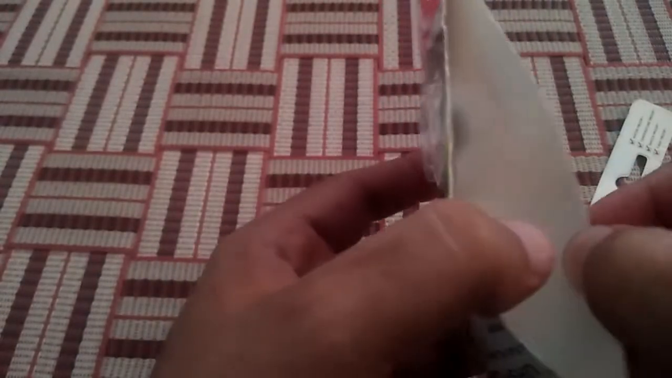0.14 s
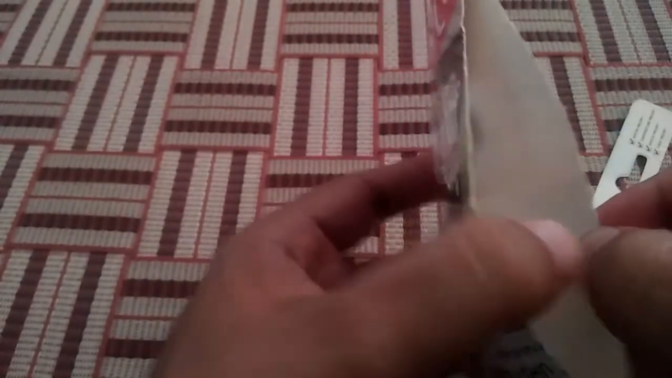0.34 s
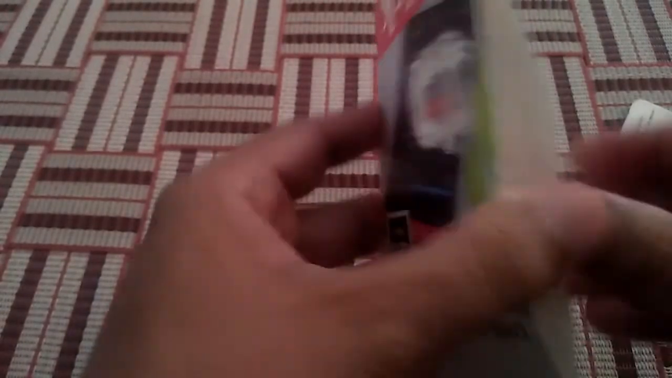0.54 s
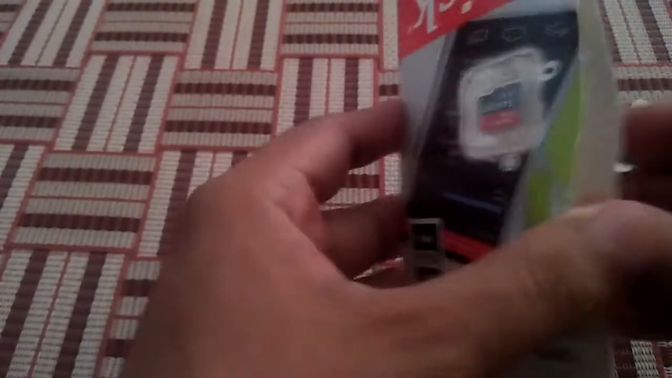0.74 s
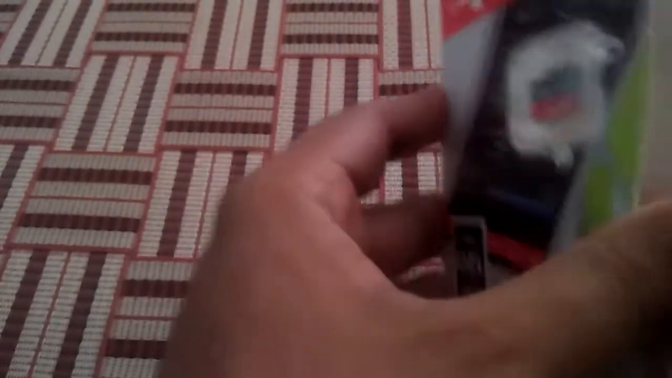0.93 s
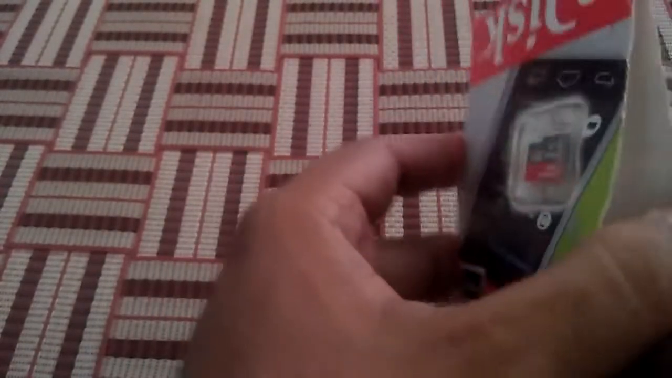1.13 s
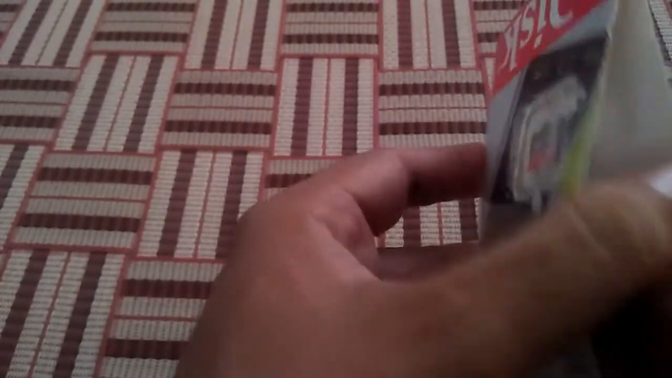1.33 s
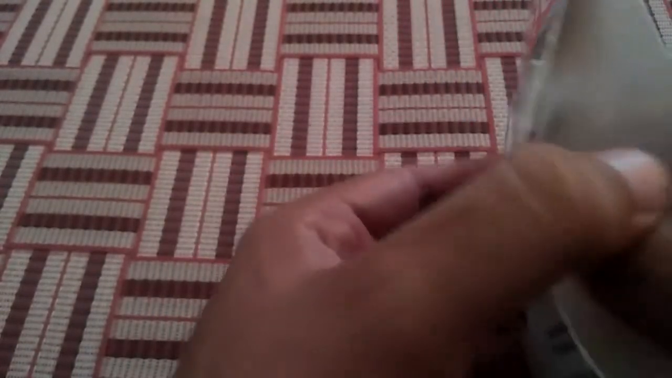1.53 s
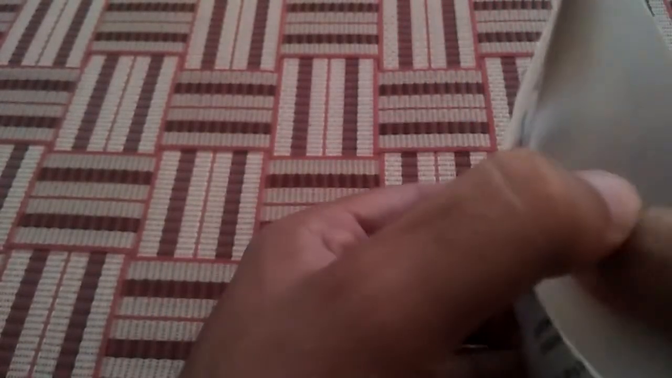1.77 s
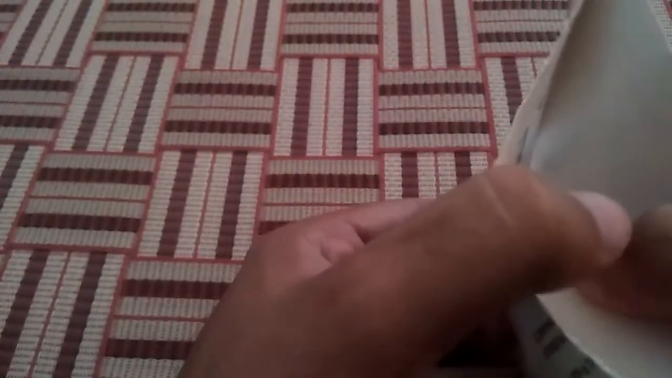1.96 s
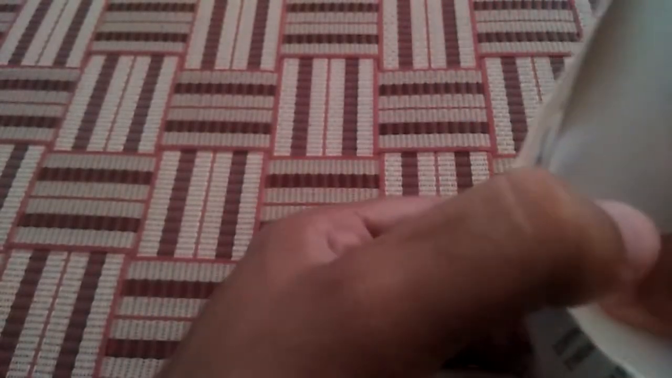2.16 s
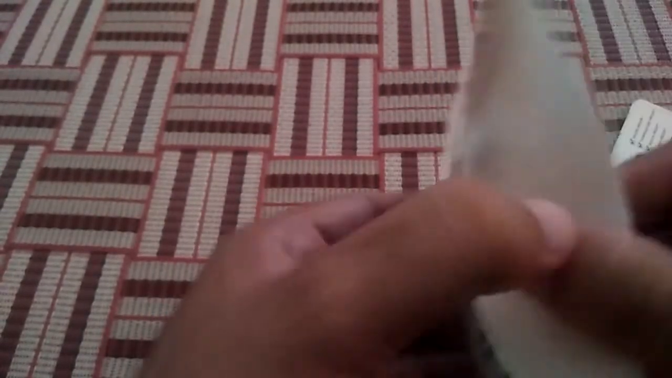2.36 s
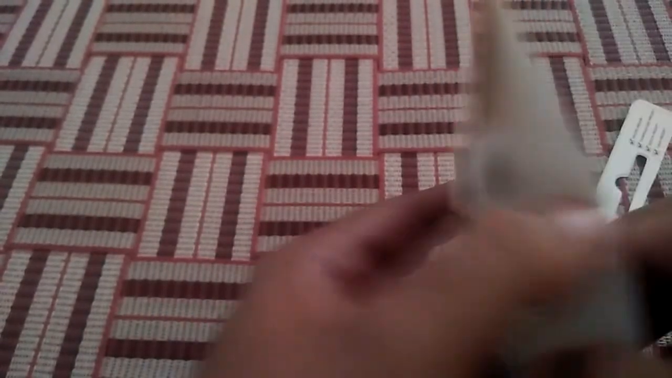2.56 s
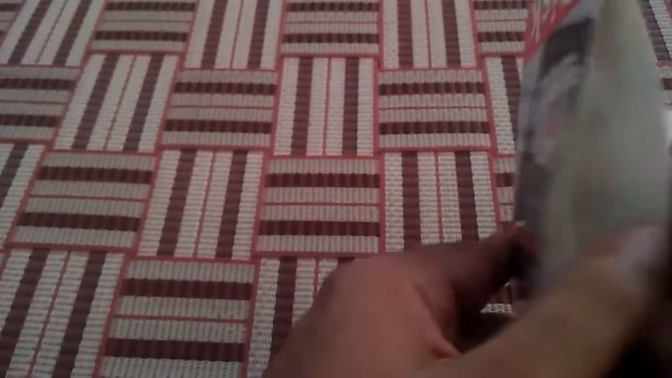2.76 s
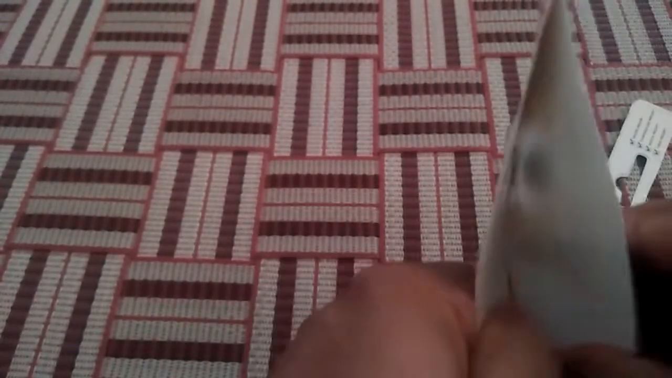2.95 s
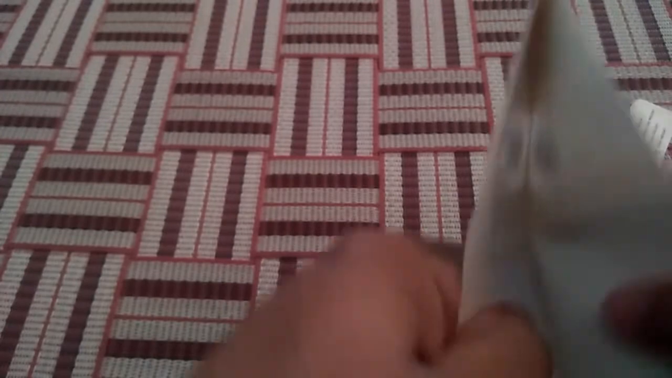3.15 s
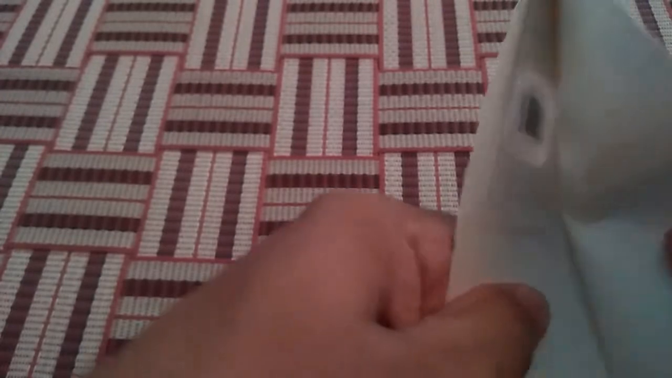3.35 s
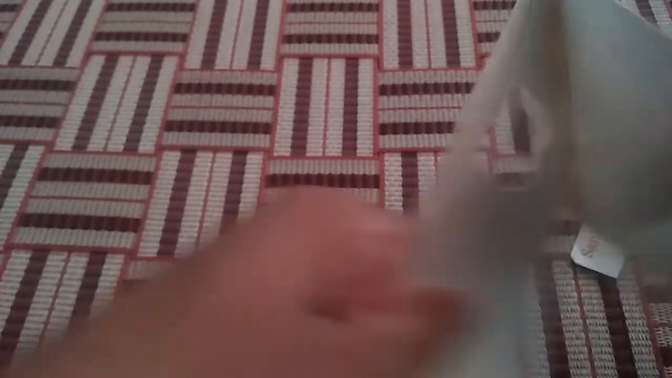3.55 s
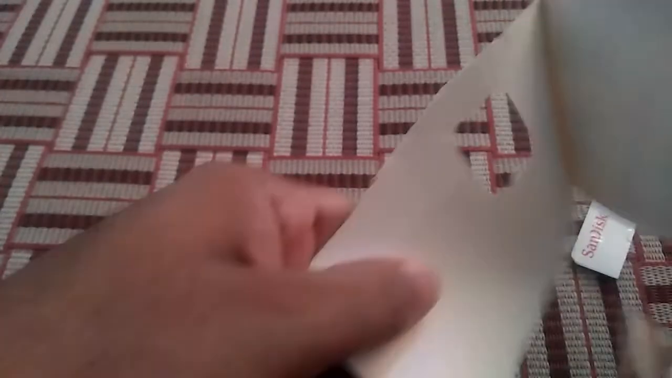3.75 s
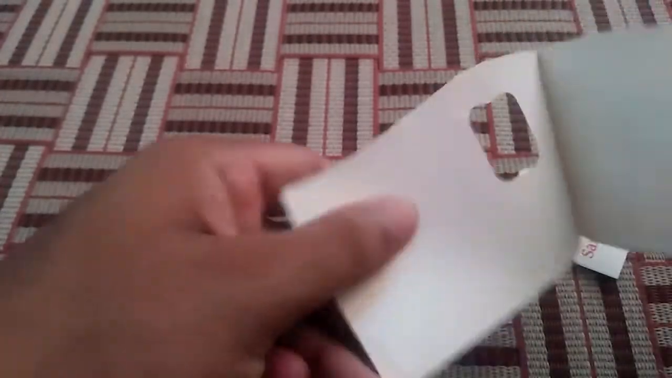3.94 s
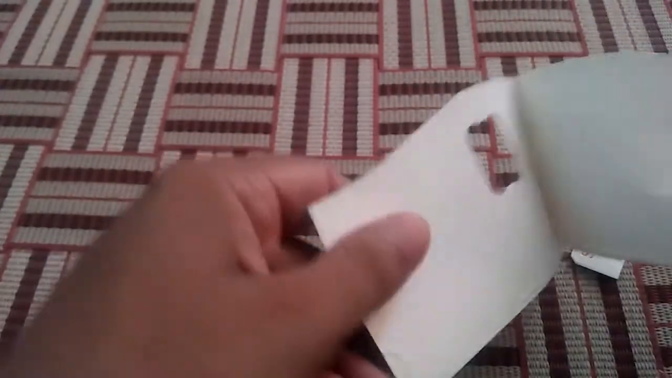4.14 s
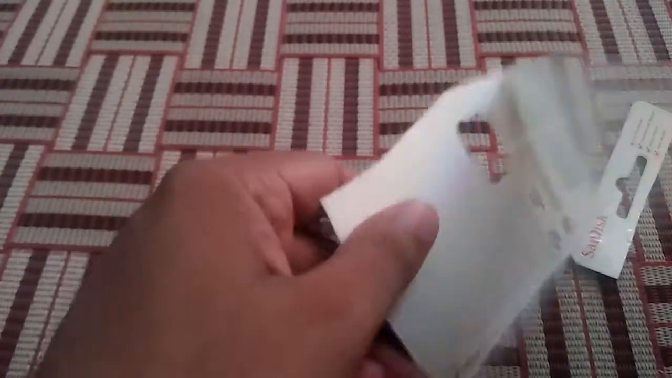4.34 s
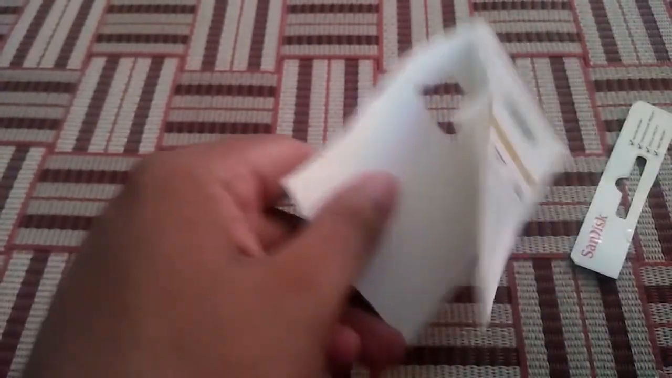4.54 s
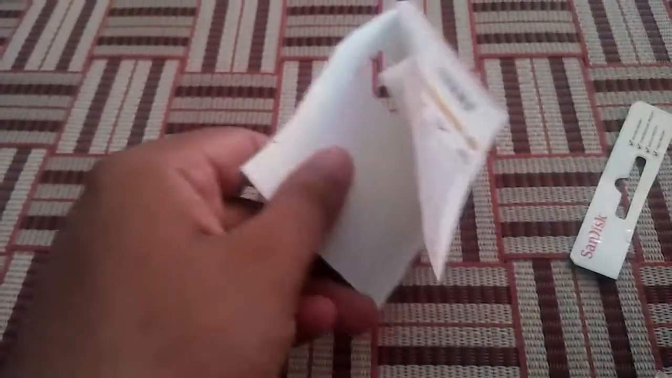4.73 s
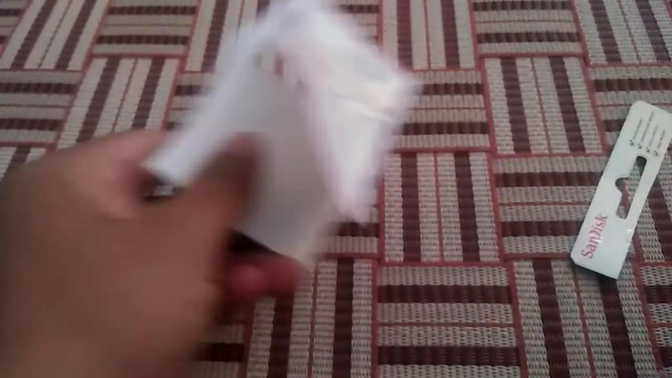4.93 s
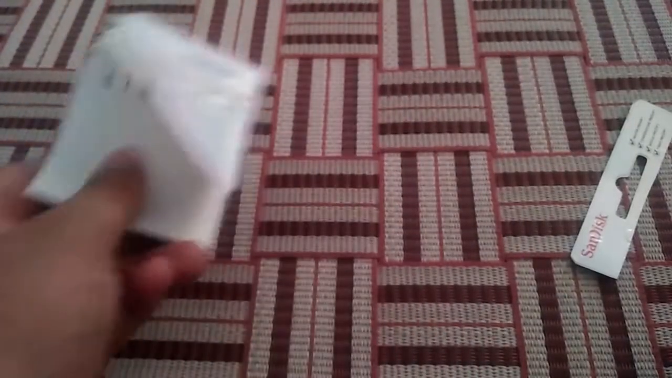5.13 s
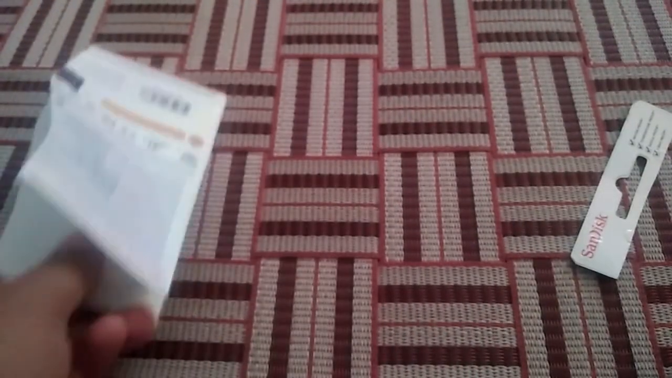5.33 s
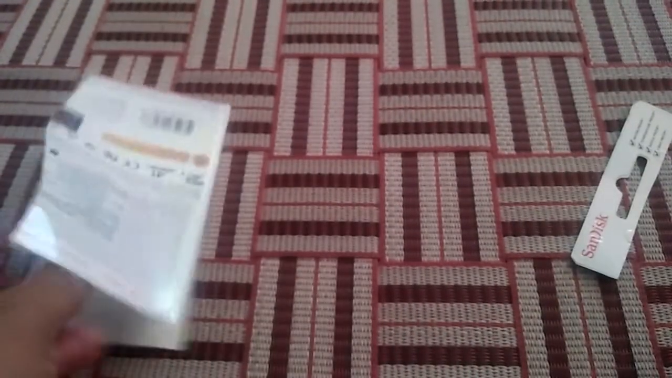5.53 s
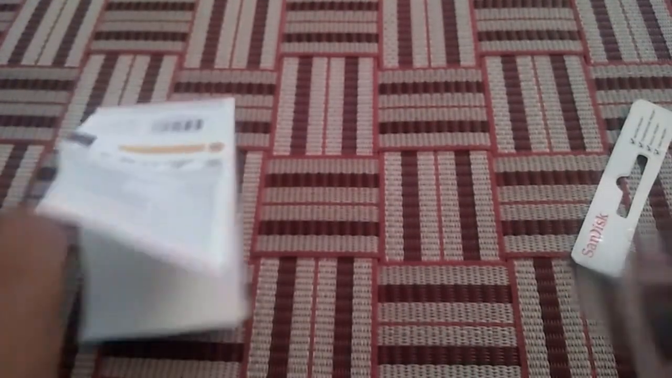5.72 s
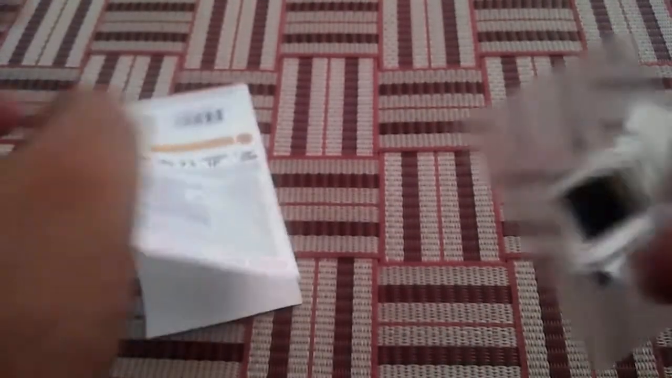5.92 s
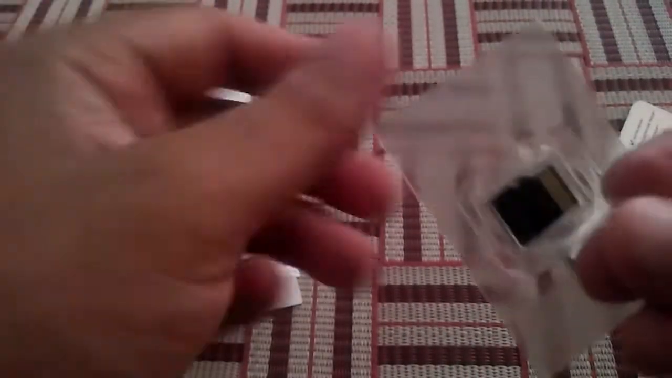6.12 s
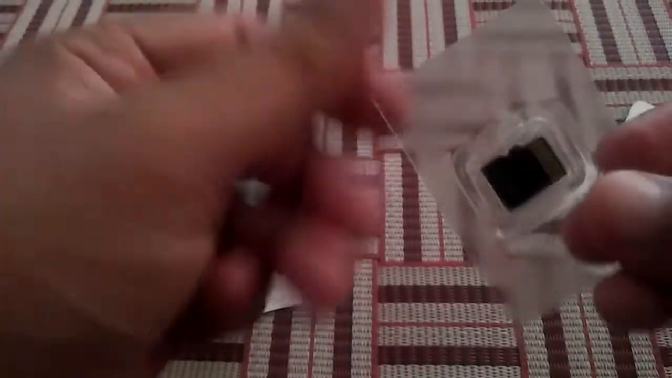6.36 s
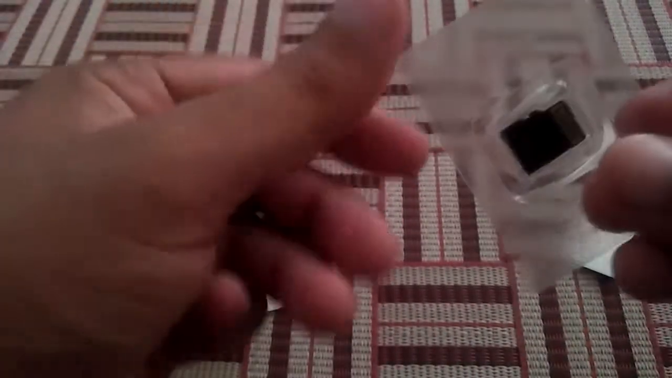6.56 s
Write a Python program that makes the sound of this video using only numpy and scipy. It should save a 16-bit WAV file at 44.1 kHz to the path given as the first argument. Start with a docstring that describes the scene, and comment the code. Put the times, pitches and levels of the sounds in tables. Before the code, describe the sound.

Hands open a cardboard and plastic package, heard up close in a quiet room. Soft rubbing and scattered ticks come first, then raspy prying and crackly peeling. A sharp plastic crack leads into a brief, loud tear, and the loose flap pushes air at the microphone. It ends with a few light card swishes, small clicks and faint bumps as the packaging is put down.

```python
"""Two hands open a card-and-plastic blister pack close to a phone in a small, quiet room.
First fingers rub the card in stick-slip friction and creases click. A thumb pries at the glued
layers, they peel, and near 3.1 s the blister snaps free. At 3.7 s the card gives way in one loud rip,
a dense train of fibre snaps, and the loose flap puffs air at the microphone.
Last, the empty card is laid on a mat with light brushes and soft thumps."""
import sys
import numpy as np
from scipy import signal
from scipy.fft import rfft, irfft, next_fast_len
from scipy.io import wavfile
from scipy.ndimage import uniform_filter1d

SR = 44100
rng = np.random.default_rng(int(sys.argv[2]) if len(sys.argv) > 2 else 0)


def output_pcm(signal):
    """Save a mono or channel-first signal as 16-bit PCM at the path in sys.argv[1].

    Samples are clipped to [-1, 1] before scaling.
    """
    pcm = np.clip(np.atleast_2d(signal).T, -1, 1) * 32767
    wavfile.write(sys.argv[1], SR, np.round(pcm).astype(np.int16))


N = 294971
TIME = np.arange(N) / SR


def rip(pocket_db=-6):
    """Fracture: the tear races along the card in dense, coarse snaps and excites the air in the slit."""
    # Each row: frequency in Hz, gain in dB.
    rip_tone = [(71, -33), (120, -7.5), (223, -10.5), (362, -27.5), (451, -11), (609, -17), (715, -2),
                (1050, -7), (1160, 2), (1840, 1.5), (2800, -2), (4100, -0.5), (4720, -0.5), (10300, -6.5),
                (14500, -14)]
    # The slit's resonance: shut pitch in Hz, open pitch in Hz, width in Hz, exponent of the glide.
    slit = (1800, 1050, 800, .3)
    tear = friction("rip", rip_tone, hiss=.35, spread_db=3, slips_per_s=2200)
    return tear + undb(pocket_db) * air_pocket(effort("rip"), *slit, follow=.72)


def squeak(start_s=3.697, length_s=.007, start_hz=7000, end_hz=10600, db=-20):
    """Periodic stick-slip: at the height of the rip the slips fall into step and speed up."""
    out, progress = np.zeros(N), np.linspace(0, 1, int(length_s * SR))
    hz = end_hz + (start_hz - end_hz) * (1 - progress) ** 2
    chirp = np.sin(2 * np.pi * np.cumsum(hz) / SR)
    add(out, start_s, undb(db) * np.sin(np.pi * progress) * chirp)
    return out


def cracks(level_db=-7, facet_db=-2, ring_db=-16, rise_s=.00045, decay_s=.0018):
    """Impulse excitation: an avalanche of fibres flicks the nearest facet and rings the whole pack."""
    # Each row: start in seconds, relative level in dB, low and top bands in dB against the middle band,
    # facet pitch in Hz.
    creases = [(.2495, -31, -26, -14, 6800), (.3056, -38, -30, 5, 6840), (.365, -48, -21, 15, 9470),
               (.5207, -49, 12, -23, 970), (.689, -34.5, -14, -22, 1850), (.7176, -48, -16, -21, 3000),
               (.9065, -32, 5, -12, 1800), (1.4855, -43, 3, -9, 1830), (1.5439, -49.5, -8, -2, 1860),
               (1.5784, -43, 0, -13, 1830), (1.7734, -45.5, 4, -5, 2220), (1.8074, -48, -20, 2, 4790),
               (1.8689, -42, -22, -8, 2150), (1.898, -41.5, -19, -4, 2330), (1.915, -42.5, -8, 1, 2110),
               (2.0538, -39.5, -30, 11, 5040), (2.3187, -33, 1, -16, 1840), (2.3618, -37, 1, 6, 9310),
               (2.3877, -45.5, 14, -4, 2080), (2.4232, -28, 3, -5.5, 2140), (2.4739, -28.5, -16, 0, 2010),
               (2.4862, -36, -28, -19, 2250), (2.6774, -46.5, 3, -24, 2420), (2.9523, -48, -8, -4.5, 4500),
               (2.9896, -35.5, -22, 2, 2390), (3.0664, -26, -6, -2, 3870), (3.0795, -9, 0, -4.5, 2260),
               (3.1112, -16.5, -12, -6, 1820), (3.3845, -39, -4, -10, 1935), (3.8495, -33, 10, 10, 1120),
               (3.8836, -35, -19, -16, 1430), (4.4366, -39.5, -12, -14, 1870),
               (5.2088, -25.5, -30, -4.5, 3100), (5.2497, -31, -30, -6.5, 1660),
               (5.2558, -39, -27, 1, 4200), (5.4988, -31, -20, -1, 9110), (5.7795, -35, -25, 1, 2770),
               (5.9503, -49.5, 8, -17, 1360)]
    bands_hz = [(600, 1420), (1300, 5770), (6000, 11000)]
    out, t = np.zeros(N), TIME[:SR // 16]
    burst = np.exp(-t / decay_s) * (1 - np.exp(-t / rise_s))
    burst_rms = np.sqrt(np.mean(burst ** 2))
    for start, db, low_db, top_db, facet_hz in creases + faint_cracks():
        low, mid, top = (unit(band(rng.standard_normal(len(t)) * burst, *edges)) for edges in bands_hz)
        fibres = (undb(low_db) * low + mid + undb(top_db) * top) * burst_rms
        facet = undb(facet_db) * burst * np.sin(2 * np.pi * facet_hz * t)
        add(out, start, undb(db + level_db) * (fibres + facet + undb(ring_db) * pack_ring(t)))
    return out


def faint_cracks(db=-57, scatter_db=2, low_db=-6, top_db=-6, facet_hz=1900, count=3):
    """Random stress release: rows for small creases that tick while a thumb feels for the edge."""
    # Each row: start and end of a fumble in seconds.
    fumbles = [(0, .22), (1.6, 1.86)]
    rows = []
    for start, end in fumbles:
        for k in range(count):
            moment = start + (end - start) * (k + rng.random()) / count
            rows.append((moment, db + scatter_db * rng.standard_normal(), low_db, top_db, facet_hz))
    return rows


def pack_ring(t, detune=.037):
    """Free vibration: the pack's modes decay, and bending shifts them a little from blow to blow."""
    # Each row: frequency in Hz, time to fall 60 dB in seconds, relative level in dB.
    pack_modes = [(1144, 0.022, -7), (1610, 0.033, -4), (1898, 0.049, 1), (2277, .025, 7.5),
                  (3010, 0.048, -5), (3996, .02, -2), (4400, 0.012, -8.5)]
    hz, t60, db = np.transpose(pack_modes)[:, :, None]
    hz = hz * (1 + detune * rng.standard_normal(hz.shape))
    return np.sum(undb(db - 60 * t / t60) * np.sin(2 * np.pi * hz * t), axis=0)


def pops():
    """Buckling: a patch of card or blister snaps through and swings a few times at its own pitch."""
    # Each row: start in seconds, level in dB, pitch in Hz, rise time in seconds.
    buckles = [(0.2508, -35.5, 1560, 0.0016), (2.3622, -23.5, 13300, 0.00047), (3.0665, -34, 3830, .0012),
               (3.0794, -15.5, 1300, .0007), (3.084, -25.5, 4020, 0.0014), (3.1111, -23, 1800, 0.00082),
               (3.283, -41.5, 1750, 0.0019), (3.3835, -38, 1935, 0.001), (3.6745, -23, 620, .0015),
               (3.7272, -21, 1370, 0.00053)]
    out, t = np.zeros(N), TIME[:SR // 16]
    for start, db, hz, rise_s in buckles:
        envelope = t / rise_s * np.exp(1 - t / rise_s)
        add(out, start, -undb(db) * envelope * np.sin(2 * np.pi * hz * t))
    return out


def pry(rasp_db=-1, pocket_db=-10.5, upper_ratio=2.15, upper_width_hz=1500):
    """Cavity resonance: a thumb rasps between the glued layers; the slit rings in two broad modes."""
    # Each row: frequency in Hz, gain in dB.
    pry_tone = [(400, -38), (1000, -9), (1550, -14), (2000, 0), (2600, -4), (3000, -11.5), (3800, -7),
                (5000, 6.5), (6500, -4.5), (8500, -0.5), (11000, -2.5), (14000, -4.5)]
    # The slit's lower mode: shut pitch in Hz, open pitch in Hz, width in Hz, exponent of the glide.
    slit = (2650, 1850, 550, 1.05)
    shut_hz, open_hz, _, bend = slit
    rasp = friction("pry", pry_tone, hiss=.6, spread_db=2.8)
    press = effort("pry")
    upper = air_pocket(press, upper_ratio * shut_hz, upper_ratio * open_hz, upper_width_hz, bend)
    lower = air_pocket(press, *slit)
    fits = unit(undb(3.5 * walk(120)))
    return undb(rasp_db) * rasp + undb(pocket_db) * fits * (lower + upper)


def peel():
    """Adhesive failure: the glued layers let go in small slips, and after the rip the pack parts."""
    # Each row of both: frequency in Hz, gain in dB.
    peel_tone = [(300, -26), (500, -7), (800, -1.5), (1200, -4.5), (1500, -4), (1850, 6), (2400, -1),
                 (3100, -0.5), (3800, -2), (5500, -0.5), (7000, -1.5), (10000, -2), (14000, -1)]
    part_tone = [(180, -45), (300, 2.5), (370, -14), (744, -10.5), (1030, -23), (1150, -1), (1820, -9.5),
                 (6140, -3), (6760, -2), (14500, -20.5)]
    peeling = friction("peel", peel_tone, hiss=.7, spread_db=3.3)
    return peeling + friction("part", part_tone, hiss=.6, spread_db=3)


def rub():
    """Sliding friction: bright scrapes, a dull thumb and then a finger pass over the closed pack."""
    # Each row of all three: frequency in Hz, gain in dB.
    scrape_tone = [(600, -33.5), (1150, -3.5), (1600, -2.5), (2000, -3), (2600, -7), (3300, 3.5),
                   (4600, -5.5), (6500, 2), (9500, -1), (12000, -7), (14500, -1)]
    thumb_tone = [(100, -11), (350, 0.5), (750, 2), (1100, 2), (1400, -7), (1900, -5.5), (2500, -10),
                  (3200, 0), (4200, -18), (5600, -20.5), (7200, -12), (10000, -22), (14000, -29)]
    finger_tone = [(150, -11), (500, -6), (750, -0.5), (1400, -13), (1750, -7.5), (2200, -3.5),
                   (2600, -11.5), (3350, -2.5), (4000, -15), (5000, -23.5), (7000, -18), (14000, -28.5)]
    scrapes = friction("scrape", scrape_tone, hiss=.96, spread_db=4.5)
    thumb = friction("thumb", thumb_tone, hiss=.8, spread_db=2)
    finger = friction("finger", finger_tone, hiss=.8, spread_db=3.5)
    return scrapes + thumb + finger


def brush():
    """Light sliding friction: the empty card hisses as it is handled and laid down."""
    # Each row: frequency in Hz, gain in dB.
    brush_tone = [(600, -36), (1700, 1.5), (3000, -6), (5000, -3), (7000, 0.5), (10000, -7), (14000, -10.5)]
    return friction("brush", brush_tone, hiss=1.0, spread_db=3.8)


def friction(kind, tone, hiss, spread_db, slips_per_s=1500, surge_s=.007):
    """Stick-slip: fibres let go in tiny uneven slips over a hiss, and at times a whole bundle goes."""
    # Each row: kind of friction, moment a bundle lets go in seconds, level in dB.
    surges = [("scrape", .2535, -35), ("pry", 1.962, -44), ("pry", 2.197, -40), ("brush", 5.742, -45),
              ("brush", 5.753, -41.5), ("rip", 3.6762, -19.5), ("rip", 3.6957, -18.5), ("rip", 3.6995, -20),
              ("rip", 3.7108, -21.5), ("rip", 3.714, -21), ("rip", 3.742, -28.5), ("part", 3.934, -37),
              ("part", 3.9425, -30), ("part", 3.9605, -31), ("part", 3.978, -35)]
    press = effort(kind)
    moving = press > 0
    sizes = undb(spread_db * np.minimum(rng.exponential(size=N), 5))
    slips = (rng.random(N) < slips_per_s / SR) * sizes * rng.choice([-1, 1], N)
    force = np.zeros(N)
    force[moving] = unit(unit(slips[moving]) + hiss * rng.standard_normal(N)[moving])
    force *= press * undb(1.6 * walk(250))
    bundles, window = np.zeros(N), signal.windows.hann(int(surge_s * SR))
    for surge_kind, centre_s, db in surges:
        if surge_kind == kind:
            add(bundles, centre_s - surge_s / 2, undb(db) * window)
    force += bundles * rng.standard_normal(N)
    filter_gain = np.linalg.norm(colour(signal.unit_impulse(SR // 16), tone))
    return colour(force, tone) / filter_gain


def effort(kind):
    """Incoherent addition: all hand strokes of one kind sum in power to one envelope."""
    # Each row: kind of friction, peak time in seconds, level in dB, rise and fall in seconds.
    strokes = [("scrape", .025, -64, .08, .05), ("scrape", .1, -63, .04, .06),
               ("scrape", .185, -64, .025, .05), ("scrape", .234, -46.5, .019, .025),
               ("scrape", .252, -40, .03, .033), ("scrape", .295, -44, .04, .05),
               ("scrape", .378, -55, .04, .032), ("scrape", .535, -69, .03, .03),
               ("scrape", 1.085, -66, .025, .025), ("thumb", .872, -44.5, .025, .035),
               ("thumb", .903, -44, .025, .025), ("finger", .99, -54, .026, .05),
               ("finger", 1.033, -50.5, .05, .03), ("finger", 1.09, -64, .03, .025),
               ("finger", 1.165, -67, .02, .02), ("pry", 1.62, -74, .05, .09), ("pry", 1.82, -69, .08, .12),
               ("pry", 1.96, -54, .1, .09), ("pry", 2.15, -53.5, .24, .22),
               ("pry", 2.275, -41.5, .075, .06), ("pry", 2.35, -57, .04, .05), ("peel", 2.45, -56, .16, .1),
               ("peel", 2.562, -52, .08, .035), ("peel", 2.705, -63.5, .035, .1),
               ("peel", 2.805, -54, .08, .055), ("peel", 3.0, -57, .03, .09),
               ("peel", 3.09, -44.5, .035, .11), ("peel", 3.28, -49, .17, .2), ("peel", 3.5, -54, .35, .1),
               ("peel", 3.533, -44, .006, .19), ("rip", 3.675, -33.5, .068, .06),
               ("rip", 3.735, -32.5, .04, .055), ("part", 3.87, -49, .05, .08),
               ("part", 3.972, -45.5, .045, .055), ("part", 4.03, -55, .012, .028),
               ("part", 4.15, -69, .025, .022), ("brush", 4.3, -64.5, .04, .04),
               ("brush", 4.437, -56, .025, .016), ("finger", 4.9, -70, .03, .035),
               ("brush", 5.225, -57.5, .045, .042), ("brush", 5.486, -59, .018, .036),
               ("brush", 5.755, -52.5, .032, .055)]
    return np.sqrt(sum(swell(*stroke) ** 2 for name, *stroke in strokes if name == kind))


def swell(peak_s, db, rise_s, fall_s, depth_db=20, roundness=1.25):
    """Envelope of one movement: it gains depth_db over the rise and loses as much over the fall."""
    away = np.maximum((peak_s - TIME) / rise_s, (TIME - peak_s) / fall_s)
    near = away < 3
    gain = np.zeros(N)
    gain[near] = undb(db - depth_db * away[near] ** roundness)
    return gain


def air_pocket(press, shut_hz, open_hz, width_hz, bend, follow=1):
    """Air resonance: tearing fibres stir it, and it sinks as the work done so far opens the slit."""
    opening = (np.cumsum(press) / press.sum()) ** bend
    hz = shut_hz * (open_hz / shut_hz) ** opening
    phase = 2 * np.pi * np.cumsum(hz) / SR
    envelope = press.max() * (press / press.max()) ** follow
    return np.sqrt(2) * walk(width_hz) * np.sin(phase) * envelope


def flex(x, depth_db=2.4, hi_hz=14000, count=30):
    """Amplitude modulation: bands swell and fade on their own, as a bending card's resonances do."""
    size = next_fast_len(N)
    log_hz = np.log(np.maximum(np.fft.rfftfreq(size, 1 / SR), 1))
    centres = np.linspace(np.log(700), np.log(hi_hz), count)
    spectrum, out = rfft(x, size), np.zeros(N)
    for share in np.eye(count):
        one_band = irfft(spectrum * np.interp(log_hz, centres, share), size)[:N]
        out += one_band * undb(depth_db * walk(12))
    return out


def thumps(roughness=.56, decay_cycles=1.9):
    """Heavily damped oscillation: soft blows of hands and flap push air, with some turbulence."""
    # Each row: start in seconds, level in dB, pitch in Hz.
    blows = [(.8, -58, 60), (.867, -37, 750), (1.195, -60, 58), (3.073, -36, 600), (3.079, -47.5, 160),
             (3.67, -44, 130), (3.701, -43, 127), (3.725, -45, 85), (3.841, -38.5, 139),
             (3.847, -33.5, 306), (3.93, -43, 110), (4.28, -45, 69), (5.326, -53, 140), (5.474, -51, 70),
             (5.961, -57, 85)]
    out, t = np.zeros(N), TIME[:SR // 3]
    for start, db, hz in blows:
        turbulence = unit(band(rng.standard_normal(len(t)), hz / 2, hz * 2))
        swing = np.sin(2 * np.pi * hz * t) + roughness * turbulence
        age = 2 * t * hz / decay_cycles
        add(out, start, undb(db) * swing * age * np.exp(1 - age))
    return out


def arm_rumble(rest_db=-83, air_db=.5, skin_db=-11, uneven_db=3):
    """Turbulence and friction: the arms stir the air and skin drags on the card, more in wide swings."""
    # Each row: fastest moment in seconds, relative level in dB, rise and fall in seconds.
    swings = [(.05, -69, .3, .22), (1.0, -68, .35, .5), (1.55, -68, .35, .35), (3.35, -66, .5, .5),
              (3.94, -53, .35, .2), (4.35, -59, .07, .15), (5.22, -53, .08, .38), (5.98, -64, .7, .25)]
    stir = np.sqrt(undb(rest_db) ** 2 + sum(swell(*swing) ** 2 for swing in swings))
    air = unit(band(rng.standard_normal(N), 42, 62)) * undb(air_db + uneven_db * walk(14))
    skin = unit(band(rng.standard_normal(N), 130, 360, order=3)) * undb(skin_db + uneven_db * walk(25))
    return (air + skin) * stir


def room(x, t60_s=.19, wet_db=-15, gap_s=.004):
    """Reverberation: the walls return a short, duller tail."""
    t = TIME[:SR // 2]
    tail = band(rng.standard_normal(len(t)), 600, 3800, order=1)
    tail *= np.exp(-np.log(1000) * t / t60_s) * (t > gap_s)
    return x + undb(wet_db) * signal.oaconvolve(x, tail / np.linalg.norm(tail))[:N]


def background(lift_db=2, waver_db=1, drone_hz=295, drone_db=-78, hiss_db=-87.5):
    """Noise floor: a faint wavering wash, one low room resonance and the microphone's steady hiss."""
    # Each row: frequency in Hz, gain in dB.
    wash_tone = [(15, -34), (25, 5.5), (54, -7), (216, -20), (282, -9), (368, -15.5), (627, -9.5),
                 (697, -14), (1010, -9.5), (2080, -27), (2310, -29), (2570, -33.5), (3010, -33),
                 (3260, -43), (14500, -42)]
    # Each row: time in seconds, level in dB before the lift.
    wash_level = [(0, -70.5), (1.5, -69), (2.5, -65.5), (4.1, -70.5), (4.8, -71.5), (5.8, -68.5),
                  (6.25, -67), (6.5, -66), (6.69, -67)]
    wash = unit(band(colour(rng.standard_normal(N), wash_tone), 40, 3300, order=4))
    wash = flex(wash, depth_db=1.8, hi_hz=2500, count=7)
    wash *= curve(wash_level) * undb(lift_db + waver_db * walk(9))
    drone = undb(drone_db) * walk(69) * np.sin(2 * np.pi * drone_hz * TIME)
    hiss = undb(hiss_db) * unit(band(rng.standard_normal(N), 2500, 13000, order=1))
    return wash + drone + hiss


def undb(db):
    """Decibels to amplitude gain."""
    return 10 ** (np.asarray(db) / 20)


def unit(x):
    """Normalisation to rms 1."""
    return x / np.sqrt(np.mean(x ** 2))


def curve(rows):
    """Gain interpolated along rows of seconds and dB, silent outside them."""
    s, db = np.transpose(rows)
    return undb(np.interp(TIME, s, db)) * (TIME >= s[0]) * (TIME <= s[-1])


def band(x, lo_hz, hi_hz, order=2):
    """Causal band-pass filter."""
    edges = [lo_hz, min(hi_hz, SR / 2 - 1)]
    return signal.sosfilt(signal.butter(order, edges, "band", fs=SR, output="sos"), x)


def colour(x, tone, size=2048):
    """Minimum-phase filter through rows of Hz and dB."""
    hz, db = np.transpose(tone)
    f = np.maximum(np.fft.rfftfreq(size, 1 / SR), 1)
    gain = undb(np.interp(np.log(f), np.log(hz), db)) * np.minimum(f / hz[0], 1) ** 2
    cepstrum = irfft(np.log(gain))
    cepstrum[1:size // 2] *= 2  # folding onto positive time makes the filter causal
    cepstrum[size // 2 + 1:] = 0
    return signal.oaconvolve(x, irfft(np.exp(rfft(cepstrum))))[:len(x)]


def walk(rate_hz):
    """Smooth random fluctuation of rms 1."""
    hold = int(SR / rate_hz)
    steps = np.repeat(rng.standard_normal(N // hold + 1), hold)
    return unit(uniform_filter1d(steps, hold)[:N])


def add(track, start_s, sound):
    """Superposition of a sound onto a track."""
    i = max(int(start_s * SR), 0)
    track[i:i + len(sound)] += sound[:N - i]


def scene():
    """Superposition of all sources; a decorrelated side signal spreads only the treble in stereo."""
    # Each row: frequency in Hz, gain in dB of the side signal's first filter.
    width_tone = [(2500, -31), (4400, -15.5), (8000, -3.5), (14000, -7)]
    handling = flex(rub() + pry() + peel() + brush())
    pack = handling + rip() + squeak() + cracks() + pops()
    mid = room(pack) + thumps() + arm_rumble() + background()
    decorrelated = colour(mid, width_tone) * walk(900)
    side = colour(decorrelated, [(2800, -39), (3800, -8), (14000, 1.5)])
    return np.array([mid + side, mid - side])


def record(dry, notch_hz=379, notch_q=5, bass_hz=38, top_hz=14400):
    """Frequency response: the phone has a hollow in its low mids and cuts the deepest bass and the top."""
    dry = signal.lfilter(*signal.iirnotch(notch_hz, notch_q, SR), dry)
    dry = signal.sosfilt(signal.butter(4, bass_hz, "high", fs=SR, output="sos"), dry)
    return signal.sosfilt(signal.ellip(10, .2, 70, top_hz, fs=SR, output="sos"), dry)


dry = scene()
out = record(dry)
output_pcm(out)
```